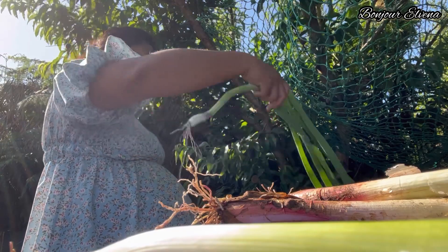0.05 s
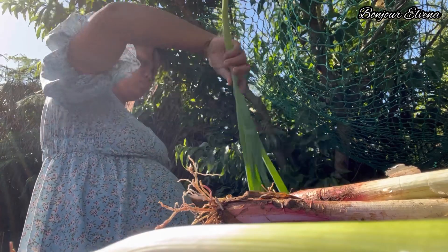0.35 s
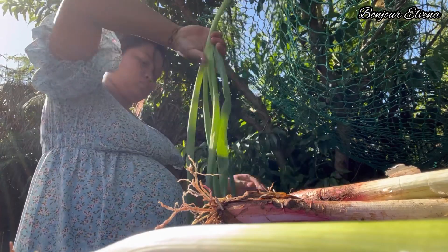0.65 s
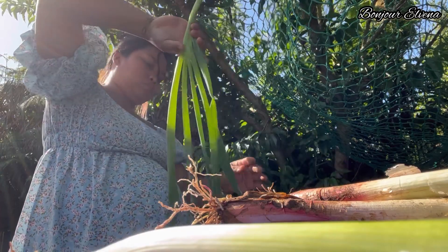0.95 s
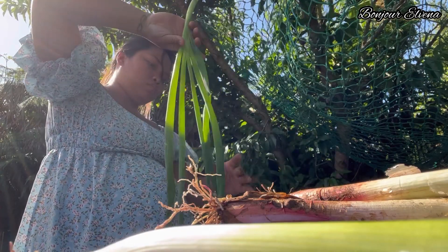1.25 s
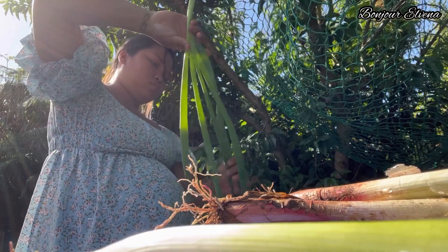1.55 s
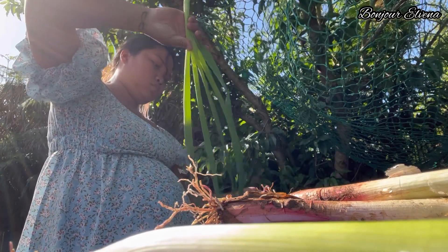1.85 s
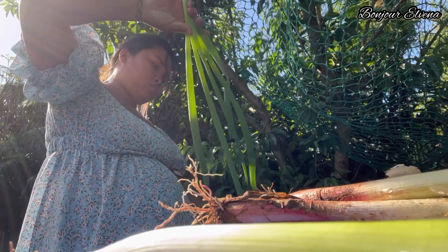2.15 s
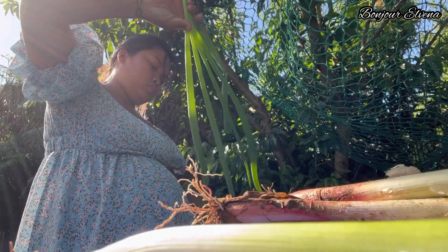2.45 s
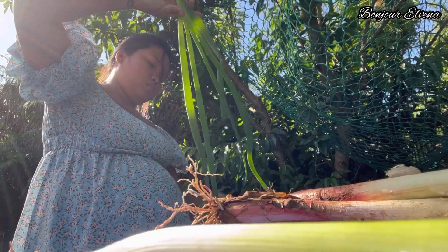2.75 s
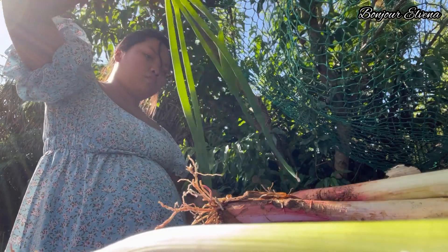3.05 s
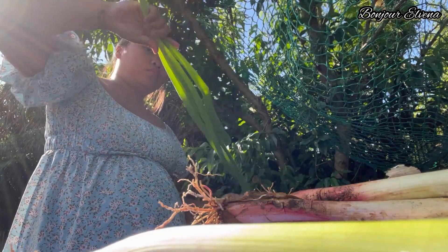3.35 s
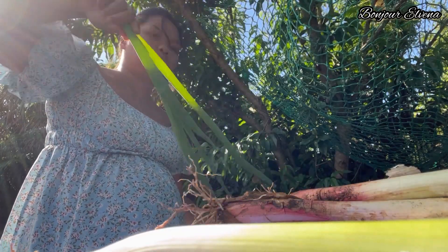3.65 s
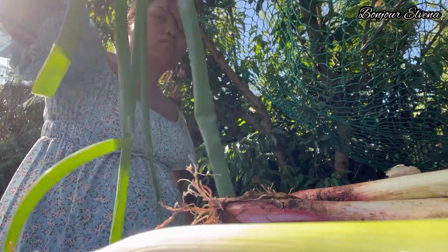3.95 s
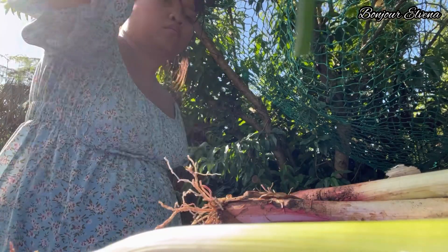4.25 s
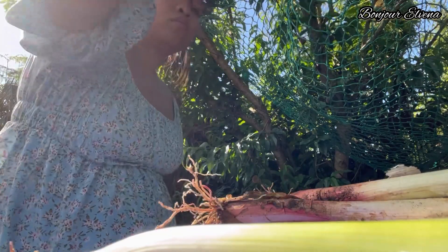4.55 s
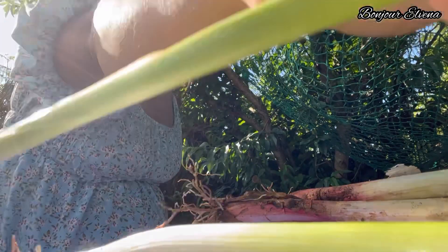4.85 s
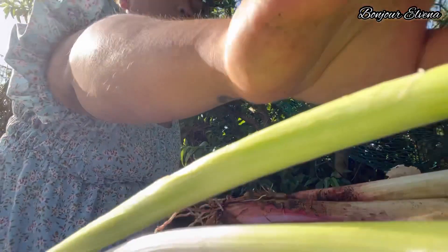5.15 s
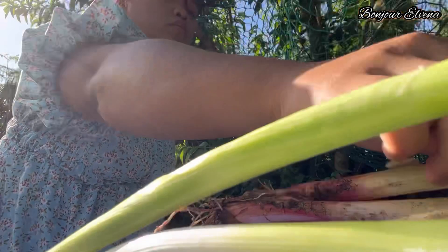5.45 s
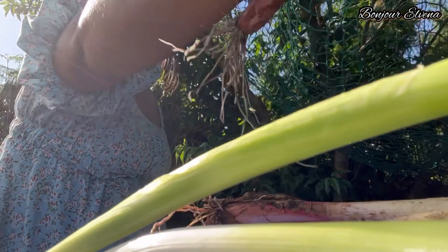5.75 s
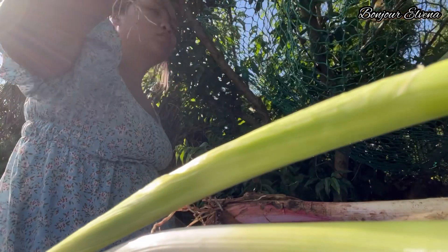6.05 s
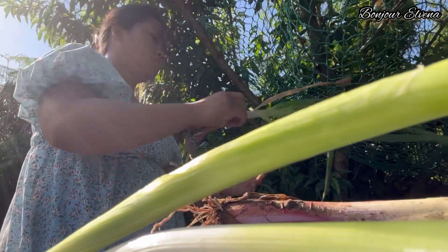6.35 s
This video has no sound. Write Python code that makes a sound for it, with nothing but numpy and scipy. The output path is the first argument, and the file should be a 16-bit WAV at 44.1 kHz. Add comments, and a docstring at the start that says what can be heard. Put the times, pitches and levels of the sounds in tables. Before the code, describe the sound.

Leaves rustle and snap as a leek is stripped by hand outdoors, then bump and scrape loudly against the microphone, with faint birds.

```python
"""Over a soft garden hum, hands strip a leek an arm's length from a phone: leaves slide and rustle,
blades snap as their fibres give way, and small birds whistle and warble far off. A torn blade creaks in
stick-slip, thick ribs crack, a blade tears, limp ones pat the stalks. From about four seconds the leek
bumps the stalks it rests among, then is pushed past the phone on the right in a loud burst of snaps,
thumps and rubbing stalks. Softer shoves follow, scraping and hissing along the case."""
import sys
import numpy as np
from scipy import signal
from scipy.fft import rfft, irfft
from scipy.io import wavfile
from scipy.ndimage import uniform_filter1d, map_coordinates

SR = 44100
rng = np.random.default_rng(int(sys.argv[2]) if len(sys.argv) > 2 else 0)


def generate_wav(sig):
    """Save sig (samples, or channels by samples) to the path in sys.argv[1] as 16-bit PCM at SR."""
    pcm = np.round(np.clip(np.atleast_2d(sig).T, -1, 1) * 32767).astype(np.int16)
    wavfile.write(sys.argv[1], SR, pcm)


N = 291280
T = np.arange(N) / SR

# Tone of the outdoor bed. Each row: frequency in Hz, gain in dB.
GARDEN_EQ = [(18, -49), (30, 8), (59, 4.5), (127, -3.5), (164, 0), (206, 2), (254, 1), (336, -2.5),
             (383, -2.5), (1020, -9), (1130, -11), (3870, -29.5), (9280, -33), (12600, -69), (14000, -47)]
# Stereo width of the bed. Each row: frequency in Hz, left-right correlation.
GARDEN_CORRELATION = [(60, 0.856), (290, 0.59), (640, 0.209), (1400, 0.15), (7000, 1)]
# Hand strokes along the leaves. Each row: start in seconds, length in seconds, level in dB.
STROKES = [(0.363, 0.257, -70.5), (0.675, 0.168, -67.5), (1.412, 0.531, -64.5), (1.524, 0.0254, -59),
           (2.025, 0.0166, -57.5), (2.407, 0.017, -62.5), (2.663, 0.249, -63.5), (2.927, 0.0814, -59),
           (3.074, 0.446, -63), (3.423, 0.035, -53.5), (3.638, 0.312, -66.5), (3.774, 0.05, -58),
           (3.97, 0.1104, -55.5), (4.126, 0.347, -67.5), (4.63, 0.075, -62)]
# Tone of sliding blades. Each row: frequency in Hz, gain in dB.
LEAF_EQ = [(300, -19), (1100, 7.5), (1600, -8), (2600, 4.5), (3900, 2), (5500, -3.5), (8000, -5.5),
           (10000, -0.5), (12500, -10.5), (16000, -30)]
# Blades breaking and stalks clacking. Each row: start in seconds, length in seconds, level in dB,
# blade ring in Hz, then hollow stalk and bare crack, both in dB against the ring.
BLADE_SNAPS = [(0.619, 0.052, -64, 2570, -6.5, 0.5), (1.7418, 0.00526, -48.5, 2380, -23, 9.5),
               (1.746, 0.00393, -47.5, 2380, -27.5, 12), (1.7505, 0.00151, -40, 2480, -21, 3.5),
               (1.754, 0.0313, -59.5, 2600, -5, 13), (2.513, 0.00185, -53.5, 6940, -13.5, -10.5),
               (2.7513, 0.00077, -45, 3720, -3, -9.5), (2.935, 0.0042, -57.5, 9000, -8, -5),
               (3.2391, 0.00445, -46, 3850, 6.5, 4.5), (3.3103, 0.00087, -53, 2530, -6, 6.5),
               (3.323, 0.0018, -51, 2470, -2.5, 1), (3.364, 0.00097, -57, 7000, -13.5, 0),
               (3.408, 0.00218, -46, 9900, -26, -4), (3.6787, 0.00124, -52.5, 1630, -2.5, 5.5),
               (4.096, 0.0081, -63, 7800, 10.5, 17), (4.774, 0.00355, -38.5, 2890, -3.5, 0.5),
               (4.808, 0.0081, -40.5, 3900, -7.5, 8), (4.8338, 0.0023, -37, 9400, -18, -5),
               (4.8417, 0.0041, -31, 6700, -7, 3.5), (4.843, 0.0081, -32.5, 1823, -2.5, 0),
               (4.86, 0.0083, -39.5, 2770, -7.5, -1.5), (4.8744, 0.00229, -34, 2970, 0, -4),
               (4.9148, 0.00064, -37.5, 9000, -16.5, 6), (4.939, 0.0015, -37, 3220, -15.5, 4),
               (5.016, 0.0317, -50, 2400, -9.5, -12), (5.0626, 0.01294, -46.5, 2650, 1, 3),
               (5.124, 0.00526, -55, 2650, 0, 10.5), (5.1772, 0.00126, -46, 2810, 1, -3),
               (5.4231, 0.00147, -39, 1660, -9, -5.5), (5.655, 0.0019, -54, 2400, 9.5, -19),
               (5.7602, 0.00105, -41.5, 2440, 5.5, -4), (5.845, 0.0136, -56.5, 2400, 10.5, 9.5),
               (6.0302, 0.0012, -47, 1424, 6.5, 0.5), (6.246, 0.0043, -58, 8900, -9.5, 0)]
# Resonances of the hollow stalk. Each row: frequency in Hz, width in Hz, gain in dB.
STALK_MODES = [(252.4, 166, 3.5), (523, 288, 2.5), (785.3, 205, 5.5), (1065.4, 145, 5), (1435, 200, -4.5)]
# A fibre's bright, dry crack. Each row: frequency in Hz, gain in dB.
CRACK_EQ = [(200, -7), (1200, 0.5), (3000, 5.5), (4200, 1), (6000, 4.5), (8200, 3), (11000, 6.5),
            (12500, -10.5), (16000, -4.5)]
# The first bird. Each row: start in seconds, length in seconds, held note in Hz, level in dB.
WHISTLES = [(.705, 0.064, 4684, -67), (1.082, 0.07, 5143, -65), (1.837, 0.047, 5153, -65.5),
            (2.556, 0.04, 5140, -66), (3.309, 0.04, 5130, -59), (4.075, 0.18, 4557, -62),
            (4.443, 0.0427, 5090, -56), (5.17, 0.113, 4560, -61.5), (6.289, 0.049, 5099, -58.5)]
# The second bird. Each row: start in seconds, length in seconds, level in dB.
WARBLES = [(1.447, 0.166, -64), (1.532, 0.0443, -57.5), (2.194, 0.1065, -67.5), (3.673, 0.1, -62.5),
           (3.782, 0.049, -68.5)]
# Slips of a torn blade. Each row: start in seconds, level in dB.
CREAK_SLIPS = [(1.8132, -43), (1.841, -44.5), (1.8493, -40), (1.859, -44), (1.865, -47.5), (1.8773, -43),
               (1.8825, -50), (1.912, -44), (1.923, -58.5)]
# Thick ribs breaking. Each row: start in seconds, length in seconds, level in dB,
# blade ring in Hz, then hollow stalk and bare crack, both in dB against the ring.
RIB_SNAPS = [(3.2375, 0.000282, -25, 1770, -6, -2), (3.4777, 0.00271, -47, 4720, 11.5, 15.5),
             (3.4831, 0.00286, -51.5, 2780, 14.5, 21.5), (3.487, 0.00416, -58, 2860, 17, 19),
             (4.1469, 0.0007, -43, 2950, 0, 8.5), (4.8457, 0.000493, -15.5, 2770, -5.5, -1)]
# One blade tearing. A single row: start in seconds, length in seconds, level in dB.
TEAR = (3.436, 0.036, -47)
# Limp blades landing. Each row: start in seconds, length in seconds, level in dB.
PATS = [(4.0092, 0.0008, -46), (4.021, 0.0028, -54.5), (4.045, 0.01, -51), (4.063, 0.0083, -55.5),
        (4.5603, 0.00046, -50.5), (5.252, 0.0035, -50.5)]
# Blows that shake the phone. Each row: start in seconds, pitch in Hz, level in dB,
# seconds to decay by 60 dB, pitch sag as a fraction.
BUMPS = [(4.027, 200, -35, 0.084, 0.146), (4.096, 157.4, -36, 0.101, 0.205), (4.16, 124, -35, 0.059, 0.32),
         (4.849, 251, -10.5, 0.043, 0.215), (4.849, 98.4, -18.5, 0.153, 0.09),
         (4.8773, 297.8, -15.5, 0.09, 0.098), (4.8888, 72.8, -14.5, 0.18, 0.112),
         (4.95, 207.9, -7.5, 0.1115, .6), (5.068, 319.2, -33, 0.128, 0.084),
         (5.0881, 73.5, -28.5, 0.4, 0.161), (5.182, 173, -30, 0.17, 0.378),
         (5.433, 177.3, -24, 0.094, 0.219), (5.787, 172.2, -29.5, 0.102, .15)]
# The leek's move from ahead to the right. Each row: time in seconds, left-channel lag in samples.
LEFT_LAG = [(4.4, 3), (4.7, 20)]
# The leek shoved against the phone. Each row: start, attack, length and release in seconds,
# then rumble, scrape, hiss and dry skin levels in dB.
SHOVES = [(4.773, 0.083, 0.0807, 0.085, -30, -24.5, -34, -40),
          (4.91, 0.0218, 0.0401, 0.2196, -26, -33.5, -41.5, -48),
          (5.168, 0.014, 0.0725, 0.078, -45, -59, -56.5, -87),
          (5.265, 0.013, 0.0478, 0.086, -46.5, -66.5, -73, -89),
          (5.414, 0.0085, 0.318, 0.035, -53, -50, -53.5, -58.5),
          (5.698, 0.0855, 0.1082, 0.107, -37, -40.5, -48.5, -49.5),
          (5.825, 0.0222, 0.0215, 0.091, -56, -38, -46.5, -46.5),
          (5.923, 0.026, 0.135, 0.067, -58, -43.5, -55, -78),
          (6.14, 0.018, 0.069, 0.154, -49, -50.5, -62, -86.5),
          (6.438, 0.0793, 0.064, 0.21, -57, -53.5, -53.5, -60)]
# Tones of those four layers. Each row: frequency in Hz, gain in dB.
RUMBLE_EQ = [(21, -35.5), (34, -62), (48, -4), (67, 4), (91, -2), (120, -3), (190, -10.5), (380, -58)]
SCRAPE_EQ = [(85, -20), (150, 6), (225, 5.5), (305, 2.5), (420, -4), (560, -4), (850, -20.5), (1130, -4.5),
             (1650, -22), (3000, -59)]
HISS_EQ = [(260, -21), (570, 12.5), (960, 5), (1500, -5.5), (2000, 2), (2600, 3), (3400, 0), (5200, -4),
           (7000, -9.5), (8600, -6), (10300, 0), (12300, -21), (13500, -21.5), (16000, -12)]
SKIN_EQ = [(1000, -28.5), (2400, -5), (3200, -13.5), (4200, -9.5), (5500, -3), (8500, 5), (11000, 3),
           (12500, 5.5), (13600, -20.5)]
# Stalk on stalk. Each row: start in seconds, length in seconds, first and last pitch in Hz, level in dB.
RUBS = [(4.831, 0.045, 780, 717.5, -33.5), (4.836, 0.0229, 465.8, 445, -27), (4.93, 0.02, 543, 513.9, -39),
        (5.063, 0.0443, 440, 508, -41), (5.243, 0.0374, 770, 648, -53.5), (5.744, 0.112, 682.1, 554.6, -50),
        (5.94, 0.076, 617, 803, -52), (6.252, 0.1183, 441.7, 608, -51.5)]
# Overall tone: a mild midrange lift, with the top treble rolled off.
# Each row: frequency in Hz, gain in dB.
MASTER_EQ = [(20, -30), (44, 3), (220, -2), (310, 3), (420, 4), (560, 3.5), (780, 1.5), (1150, 2.5),
             (1950, 1), (2850, 0.5), (3900, 0.5), (9500, -0.5), (12200, -6.5), (13400, -6), (16000, -19)]


def undb(db):
    """Decibels to gain."""
    return 10 ** (np.asarray(db) / 20)


def unit(x):
    """Scale to rms 1."""
    return x / np.sqrt(np.mean(x ** 2) + 1e-20)


def on_bins(points, size):
    """Read a (Hz, value) curve at each FFT bin."""
    hz, value = np.transpose(points)
    bin_hz = np.arange(size // 2 + 1) * SR / size
    return np.interp(np.log(bin_hz + 1), np.log(hz), value)


def eq(x, curve, size=4096):
    """Minimum-phase EQ along a (Hz, dB) curve."""
    cepstrum = irfft(np.log(undb(on_bins(curve, size))))
    cepstrum[1:size // 2] *= 2
    cepstrum[size // 2 + 1:] = 0
    return signal.fftconvolve(x, irfft(np.exp(rfft(cepstrum))))[:len(x)]


def ring(x, hz, width_hz):
    """One resonance, gain 1 at its centre."""
    return signal.lfilter(*signal.iirpeak(min(hz, SR / 3), hz / width_hz, fs=SR), x)


def wander(rate):
    """Slow random modulation at rms 1, gliding to a new value `rate` times a second."""
    hold = int(SR / rate)
    steps = np.repeat(rng.uniform(-1, 1, N // hold + 1), hold)
    return unit(uniform_filter1d(steps, hold)[:N])


def grains(rate, spread_db):
    """Tiny random slips, about `rate` a second, mostly small and a few large."""
    fires = rng.random(N) < rate / SR
    size = np.minimum(rng.exponential(size=N), 5)
    return unit(fires * rng.choice([-1, 1], N) * undb(spread_db * size))


def swell(start, attack, length, release):
    """Envelope: ramp up over the attack; from start + length, fall 20 dB per release time."""
    age = T - start
    return np.clip(age / attack, 0, 1) * undb(-20 * np.maximum(age - length, 0) / release)


def add(track, start, sound):
    """Mix a sound into a track at a start in seconds."""
    first = int(start * SR)
    track[..., first:first + sound.shape[-1]] += sound[..., :N - first]


def echoes(x, t60, delay_s):
    """Stereo reverb: scatter from ground and foliage, different on each side."""
    t = T[:SR // 2]
    tails = rng.standard_normal((2, len(t))) * undb(-60 * t / t60) * (t > delay_s)
    return np.array([signal.fftconvolve(x, tail / np.linalg.norm(tail))[:N] for tail in tails])


def pan(x):
    """Place a leaf sound: the left port is further away, so it hears it later and softer."""
    lag = np.interp(T, *np.transpose(LEFT_LAG))
    left = map_coordinates(x, [np.arange(N) - lag], order=3)
    return np.array([undb(-1) * left, x])


def garden_hum(level_db=-57, lean_right_db=2.5, waver_db=1.1062):
    """A distant outdoor bed, widest in the mids and gently wavering."""
    mid, side = rfft(rng.standard_normal((2, N)))
    alike = on_bins(GARDEN_CORRELATION, N)
    polarity = np.array([[1], [-1]])
    spectra = mid * np.sqrt(1 + alike) + polarity * side * np.sqrt(1 - alike)
    air = unit(irfft(spectra * undb(on_bins(GARDEN_EQ, N)), N))
    return air * undb(level_db + waver_db * wander(2.384) - polarity * lean_right_db / 2)


def friction(curve, slip_rate, catch_rate, catch_db, width_db):
    """Ribbed leaf skin catches and slips in many places, so each port also hears slips of its own."""
    grip = undb(catch_db * wander(catch_rate))
    shared, left, right = (eq(grains(slip_rate, spread_db=3) * grip, curve) for _ in range(3))
    return unit(pan(shared) + undb(width_db) * np.array([left, right]))


def crinkles(rate, low_hz, high_hz, spread_db):
    """Tiny folds buckle at random, each ringing briefly at one of nine pitches."""
    pitches = np.geomspace(low_hz, high_hz, 9)
    bands = (ring(grains(rate / len(pitches), spread_db), hz, hz / 2) for hz in pitches)
    return unit(sum(unit(band) for band in bands))


def sliding_leaves(attack_s=0.037, release_s=0.126, stir_db=-69.5, crackle_db=-9.5):
    """Each stroke slides blade over blade with a fine crackle; in between, the held leaves still stir."""
    power = sum((undb(db) * swell(start, attack_s, length, release_s)) ** 2
                for start, length, db in STROKES)
    slide = friction(LEAF_EQ, slip_rate=10000, catch_rate=54, catch_db=2.5, width_db=12)
    crackle = pan(crinkles(rate=500, low_hz=1800, high_hz=8000, spread_db=2.8))
    return np.sqrt(power + undb(stir_db) ** 2) * (slide + undb(crackle_db) * crackle)


def snap(length, db, hz, stalk_db, crack_db, fibre_rate=11000):
    """A run of fibres gives way: the ring of the blade, the hollow stalk's body and a bare crack."""
    t = T[:4096]
    fibres = rng.standard_normal(len(t)) * (rng.random(len(t)) < fibre_rate / SR)
    fibres[0] = 2  # the first fibre to go
    fibres *= np.exp(-(t / length) ** 2)
    blade = ring(ring(fibres, hz, hz / 1.5), hz, hz)  # sappy and damped: only a cycle or two
    stalk = sum(undb(mode_db) * ring(ring(fibres, mode_hz, width_hz), mode_hz, mode_hz)
                for mode_hz, width_hz, mode_db in STALK_MODES)
    crack = eq(fibres, CRACK_EQ)
    sound = unit(blade) + undb(stalk_db) * unit(stalk) + undb(crack_db) * unit(crack)
    return undb(db) * sound * np.sqrt(length / t[-1])  # a longer tear frees more energy


def bird_note(hz, quiver_hz, flutter_db):
    """A thin tone along a pitch path, quivering in pitch and fluttering in level."""
    count = len(hz)
    pitch = hz + quiver_hz * wander(600)[:count]
    gain = np.sin(np.linspace(0, np.pi, count)) * undb(flutter_db * wander(96.5)[:count])
    return gain * np.sin(2 * np.pi * np.cumsum(pitch) / SR)


def birds(warble_hz=4000, swing_hz=230, swings_per_s=16.5):
    """One bird drops quickly onto a held note, another warbles lower and hoarsely; trees blur both."""
    song = np.zeros(N)
    for start, length, held_hz, db in WHISTLES:
        t = T[:int(length * SR)]
        hz = held_hz * (1 + 0.2 * np.exp(-t / (0.11 * length)))
        add(song, start, undb(db) * bird_note(hz, quiver_hz=55, flutter_db=2.5))
    for start, length, db in WARBLES:
        t = T[:int(length * SR)]
        hz = warble_hz + swing_hz * np.cos(2 * np.pi * swings_per_s * t)
        add(song, start, undb(db) * bird_note(hz, quiver_hz=95, flutter_db=3))
    early = echoes(song, t60=0.05, delay_s=0.002)
    tail = echoes(song, t60=0.6, delay_s=0.025)
    return undb(-2) * song + undb(-6) * early + undb(-12) * tail


def creak():
    """A torn blade sticks and slips: a string of tiny clicks, as (start, sound) cues."""
    return [(start, snap(0.0003, db, hz=2400, stalk_db=-7, crack_db=-1)) for start, db in CREAK_SLIPS]


def rib_snap(*settings, low_lag_s=0.007029, half_lag_hz=782.05):
    """A rib breaks; bending waves run along the plant, highs first, making a short falling chirp."""
    click = snap(*settings)
    hz = np.arange(len(click) // 2 + 1) * SR / len(click)
    lag = low_lag_s / (1 + (hz / half_lag_hz) ** 2)
    return irfft(rfft(click) * np.exp(-2j * np.pi * np.cumsum(lag) * hz[1]))


def tearing():
    """Fibres part in a ragged run that grows until the blade gives way."""
    start, length, db = TEAR
    fibres = crinkles(rate=11000, low_hz=1800, high_hz=4800, spread_db=1)
    return pan(fibres * undb(db) * swell(start, length, length, release=0.016))


def pats():
    """Limp blades land on the stalks: duller taps, as (start, sound) cues."""
    return [(start, snap(length, db, hz=1150, stalk_db=-6, crack_db=-4)) for start, length, db in PATS]


def bumps(rise_s=0.00091, sag_s=0.0427):
    """Soft thumps; each sags in pitch as the pressure lets go."""
    thumps, t = np.zeros(N), T[:SR // 2]
    for start, hz, db, t60, sag in BUMPS:
        pitch = hz * (1 - sag * (1 - np.exp(-t / sag_s)))
        envelope = undb(db - 60 * t / t60) * (1 - np.exp(-t / rise_s))
        add(thumps, start, envelope * np.sin(2 * np.pi * np.cumsum(pitch) / SR))
    return thumps


def shove_envelope(levels_db):
    """One layer's gain: the shoves, each at its own level, add up in power."""
    return np.sqrt(sum((undb(db) * swell(*shove[:4])) ** 2 for shove, db in zip(SHOVES, levels_db)))


def brushing_hiss(drag_db=-3, crinkle_db=-7):
    """The leek drags close by the microphone; its leaves crinkle and its dry outer skin fizzes."""
    *_, hiss_db, skin_db = np.transpose(SHOVES)
    drag = friction(HISS_EQ, slip_rate=3200, catch_rate=130, catch_db=2.5, width_db=6)
    folds = pan(crinkles(rate=1200, low_hz=2300, high_hz=9500, spread_db=3.2))
    skin = friction(SKIN_EQ, slip_rate=3000, catch_rate=92, catch_db=3.5, width_db=2.5)
    hiss = undb(drag_db) * drag + undb(crinkle_db) * folds
    return hiss * shove_envelope(hiss_db) + skin * shove_envelope(skin_db)


def handling_noise(left_db=-9, far_end_lag_s=0.001707):
    """Through the case, rumble sways both ports together and scraping rocks them against each other."""
    *_, rumble_db, scrape_db, _, _ = np.transpose(SHOVES)
    rumbles = [unit(eq(rng.standard_normal(N), RUMBLE_EQ)) for _ in range(2)]
    scrapes = [unit(eq(grains(rate=1800, spread_db=3), SCRAPE_EQ)) for _ in range(2)]
    sway, left_sway = shove_envelope(rumble_db) * rumbles
    rock, left_rock = shove_envelope(scrape_db) * scrapes
    rock = rock + stalk_rubs()
    thumps = bumps()
    late_thumps = np.roll(thumps, int(far_end_lag_s * SR))  # the far end of the case follows late
    left = sway + left_sway + 0.93 * (left_rock - rock) + 0.78 * late_thumps
    return np.array([undb(left_db) * left, sway + rock + thumps])


def stalk_rubs(width_hz=110, drift_depth=0.08, attack_s=0.0113, release_s=0.0843):
    """Stalk rubs on stalk: slips ring the hollow tube, whose pitch moves with the point of contact."""
    rubs = np.zeros(N)
    lowpass = signal.butter(2, width_hz / 2, fs=SR, output="sos")
    slips = unit(signal.sosfilt(lowpass, grains(rate=250, spread_db=2)))
    drift = 1 + drift_depth * wander(25)
    for start, length, first_hz, last_hz, db in RUBS:
        hz = np.interp(T, [start, start + length], [first_hz, last_hz]) * drift
        tube = slips * np.sin(2 * np.pi * np.cumsum(hz) / SR)
        rubs += undb(db) * swell(start, attack_s, length, release_s) * tube
    return rubs


def scene(scatter_db=-3, hedge_db=-11.5):
    """The mix: leaves with reflections off stalks and hedge, plus handling noise, birds and the bed."""
    cues = [(start, snap(*row)) for start, *row in BLADE_SNAPS]
    cues += [(start, rib_snap(*row)) for start, *row in RIB_SNAPS]
    hits, scatter = np.zeros(N), np.zeros((2, N))
    for start, sound in cues + creak() + pats():
        add(hits, start, sound)
        add(scatter, start, echoes(sound, t60=0.00392, delay_s=0.0002))  # off the nearby stalks
    leaves = pan(hits) + undb(scatter_db) * scatter + tearing() + sliding_leaves() + brushing_hiss()
    hedge = undb(hedge_db) * echoes(leaves[1], t60=0.1145, delay_s=0.0046)
    return leaves + hedge + handling_noise() + birds() + garden_hum()


def record(dry, low_cut_hz=42, high_cut_hz=16000):
    """Master tone: lift the mids a little, drop the deepest rumble and cut the top."""
    heard = np.array([eq(channel, MASTER_EQ) for channel in dry])
    heard = signal.sosfilt(signal.butter(3, low_cut_hz, "highpass", fs=SR, output="sos"), heard)
    return signal.sosfilt(signal.ellip(8, .2, 70, high_cut_hz, fs=SR, output="sos"), heard)


dry = scene()
out = record(dry)
generate_wav(out)
```